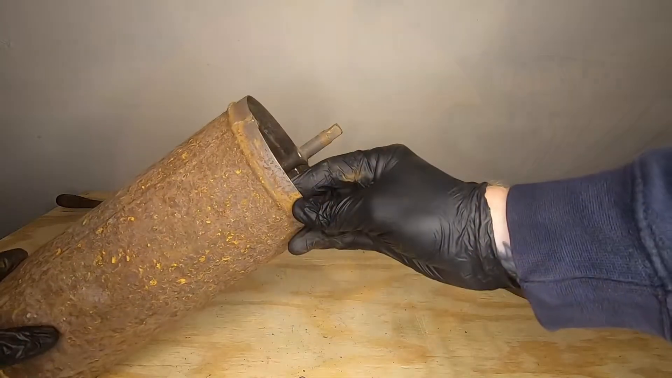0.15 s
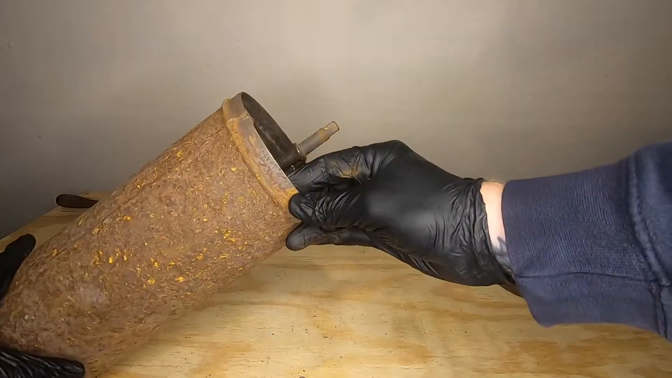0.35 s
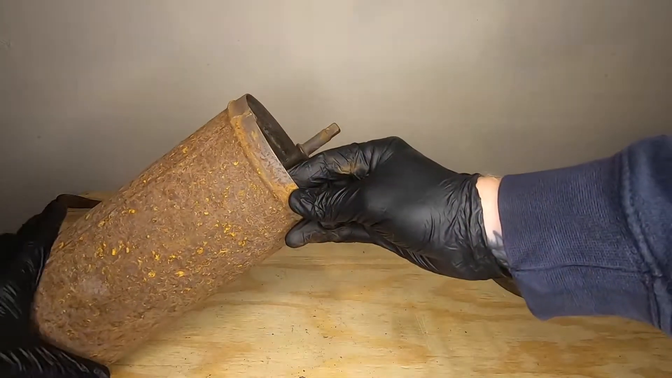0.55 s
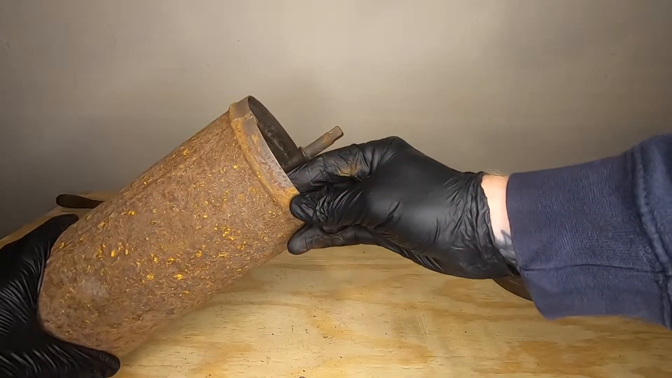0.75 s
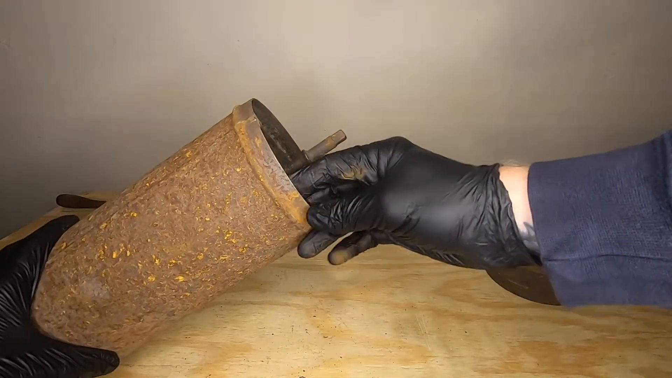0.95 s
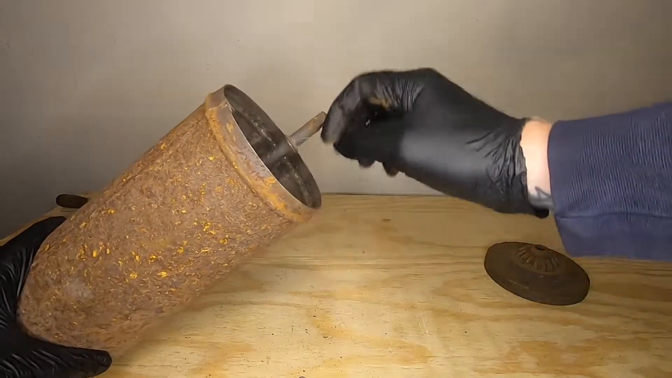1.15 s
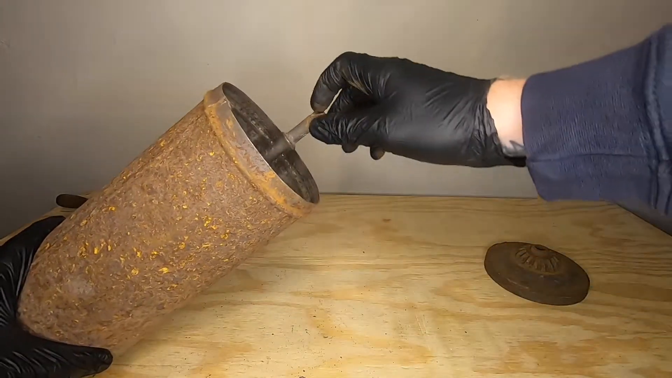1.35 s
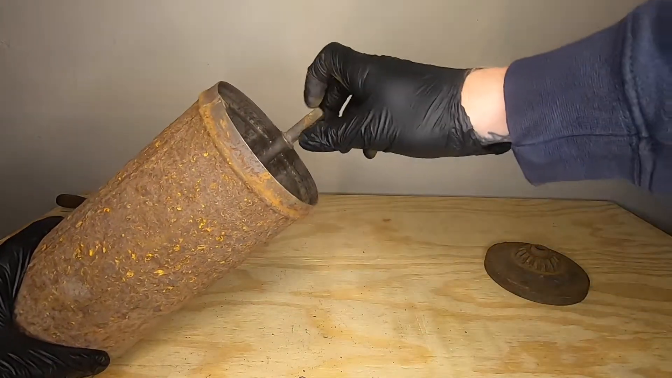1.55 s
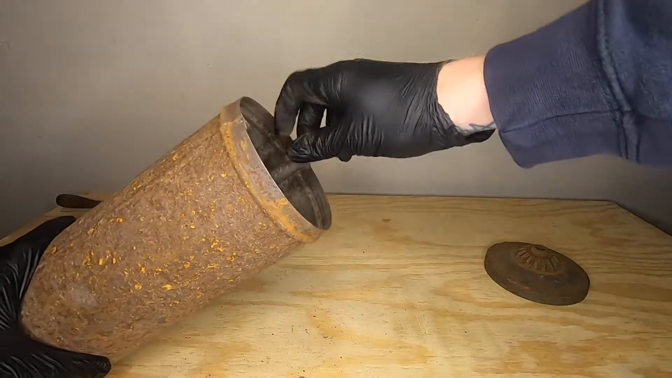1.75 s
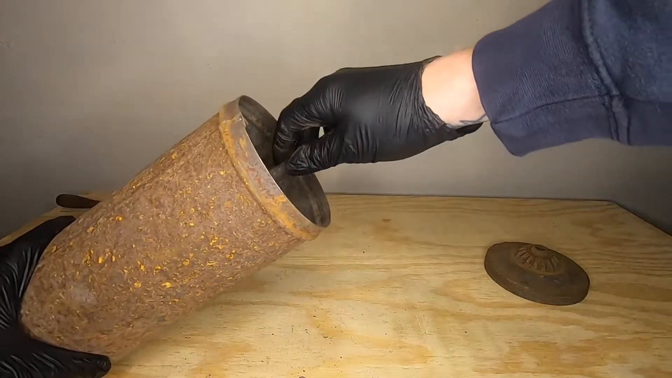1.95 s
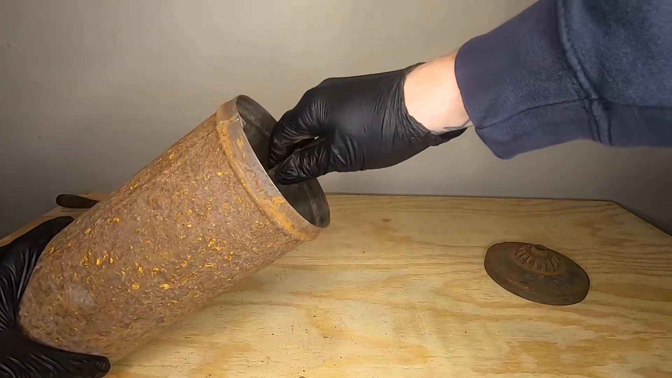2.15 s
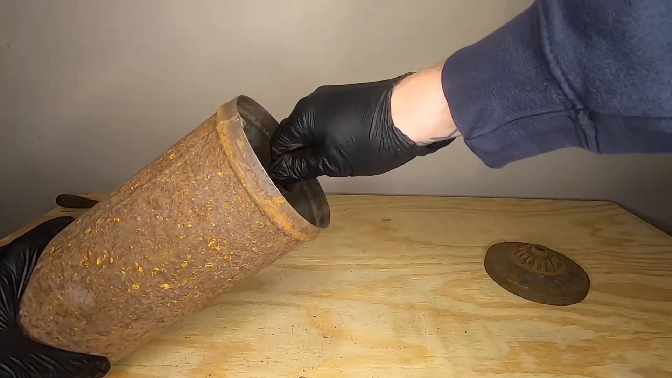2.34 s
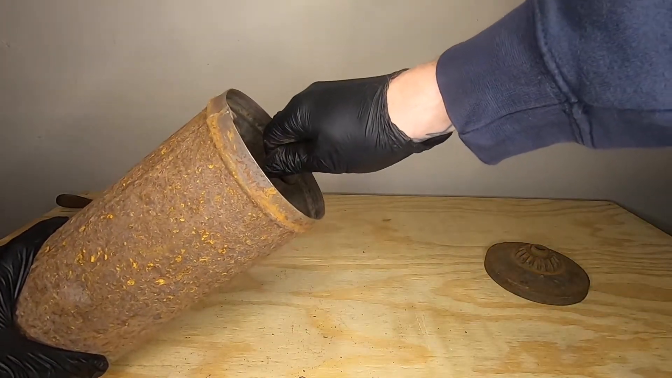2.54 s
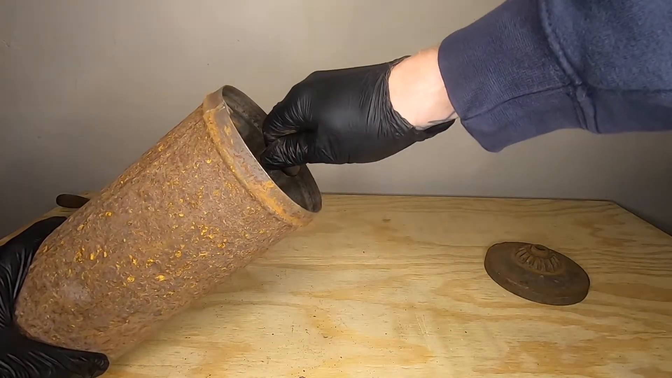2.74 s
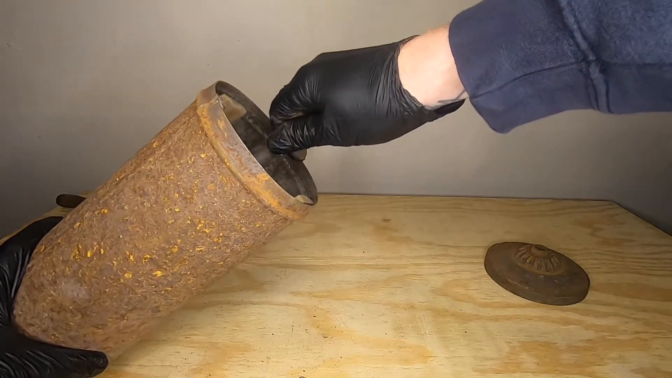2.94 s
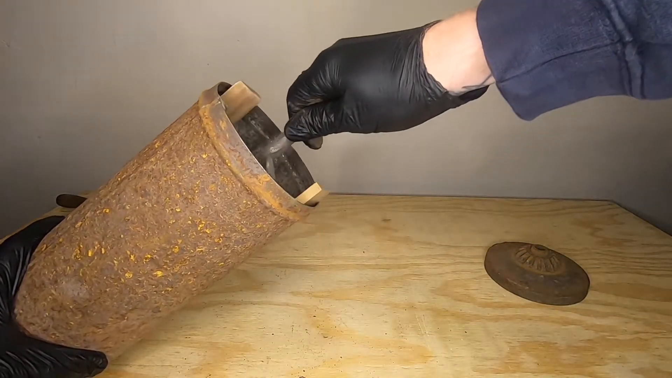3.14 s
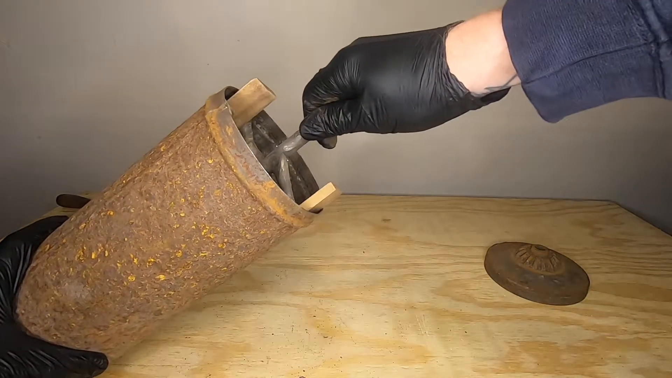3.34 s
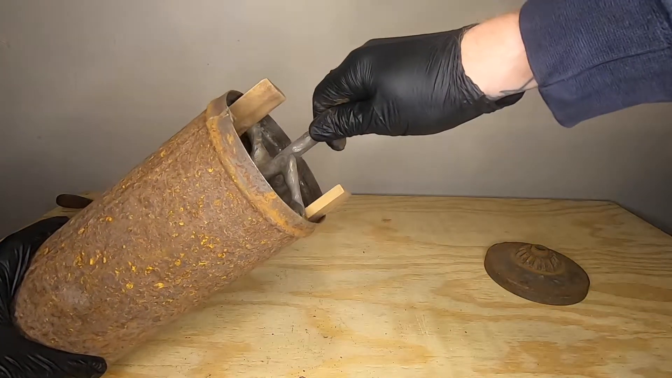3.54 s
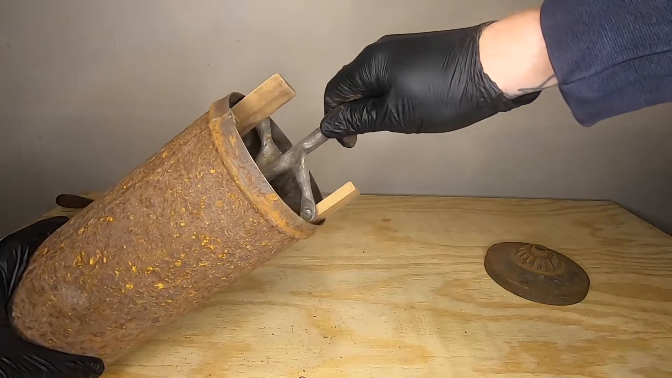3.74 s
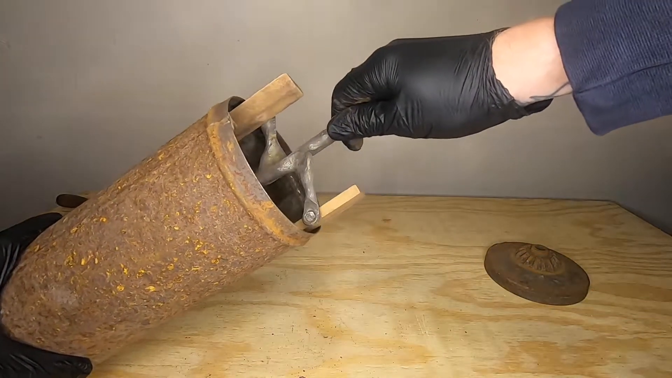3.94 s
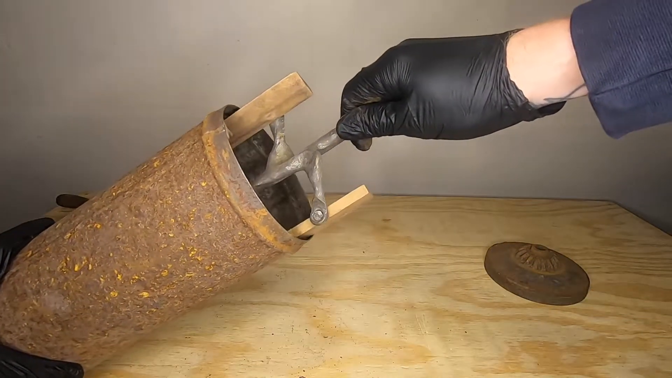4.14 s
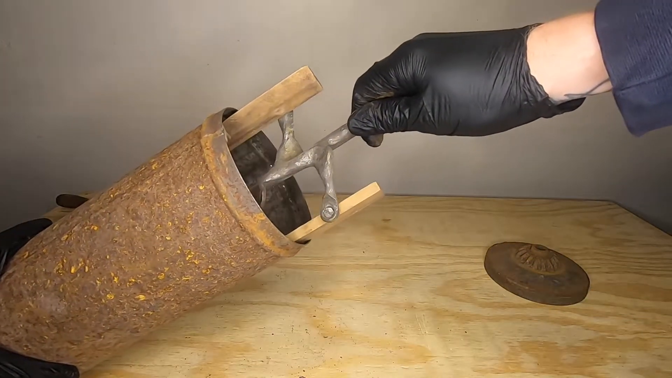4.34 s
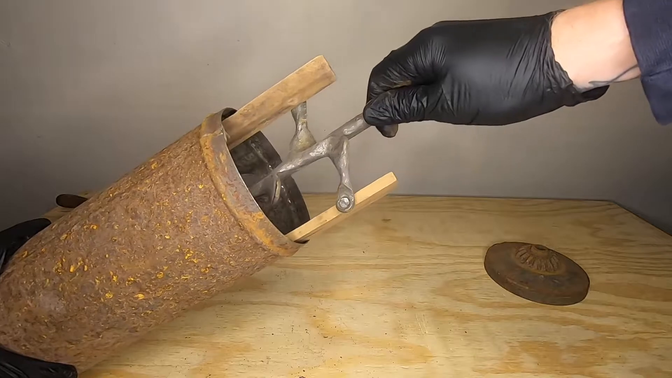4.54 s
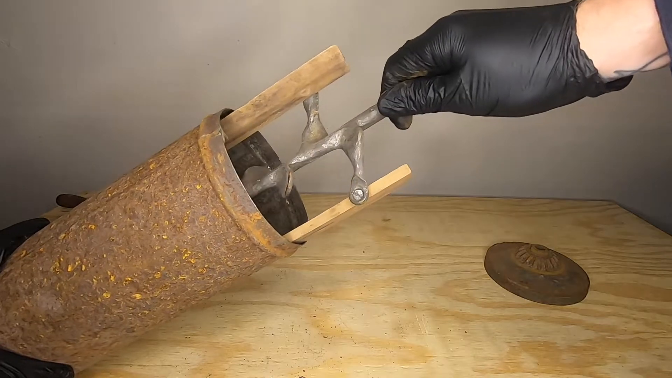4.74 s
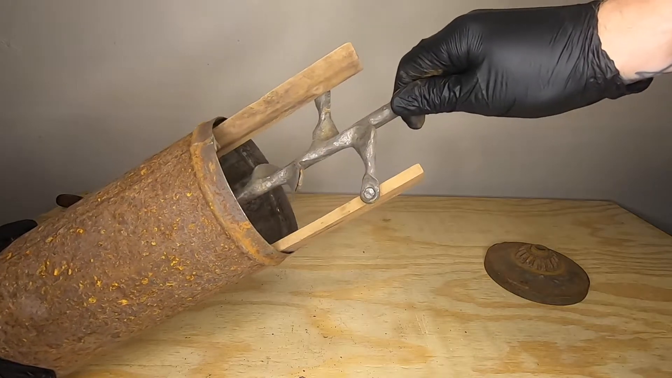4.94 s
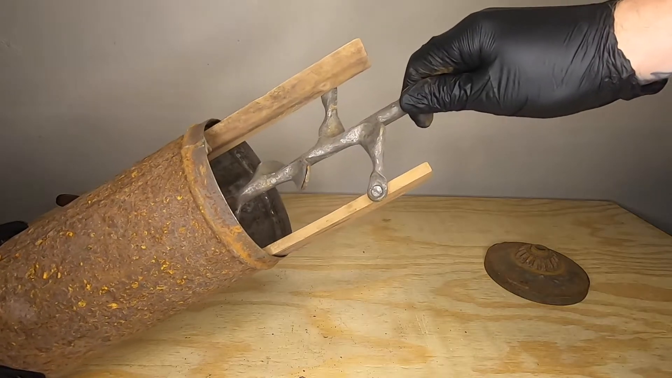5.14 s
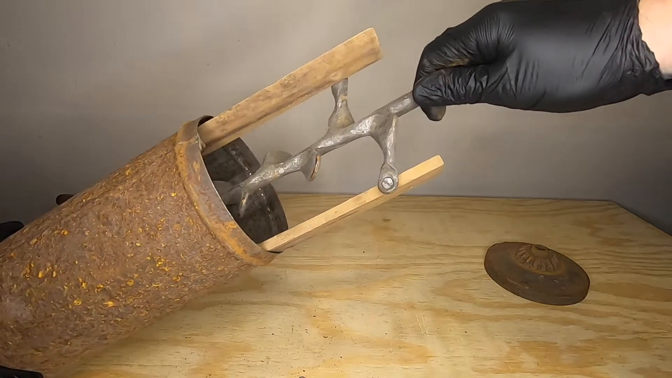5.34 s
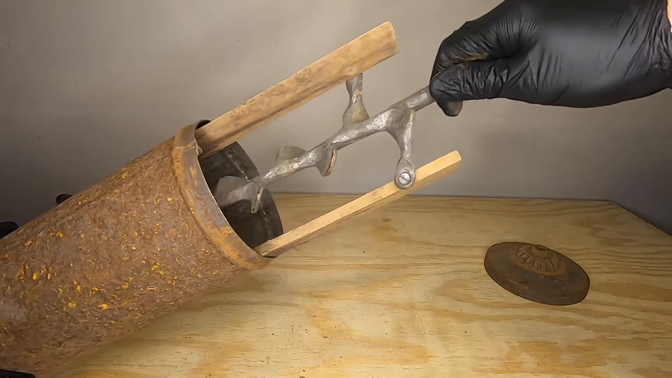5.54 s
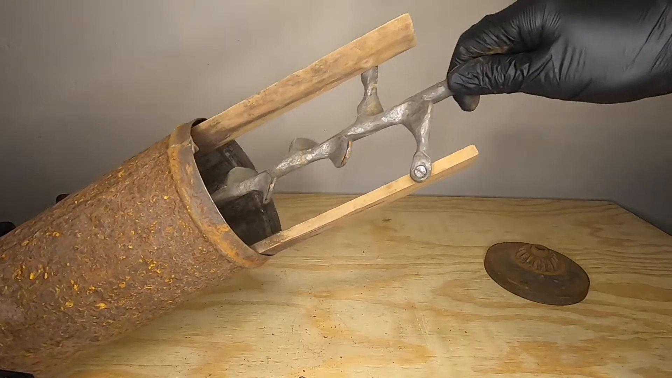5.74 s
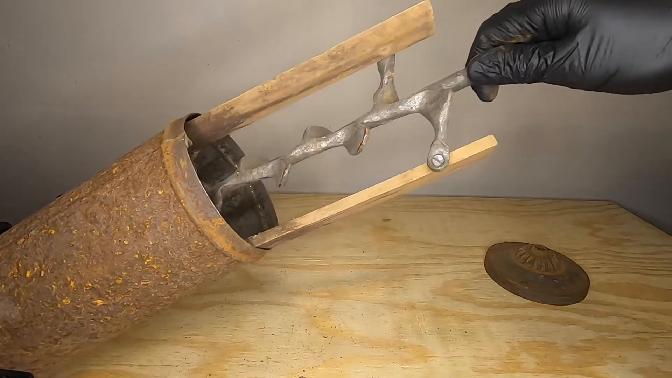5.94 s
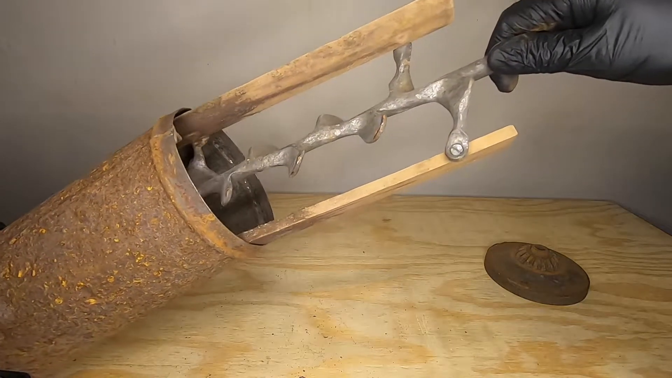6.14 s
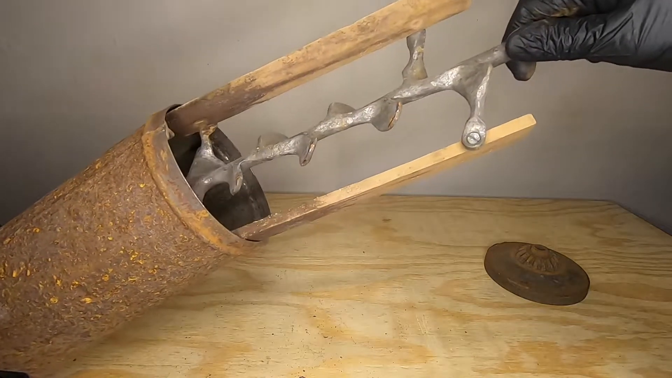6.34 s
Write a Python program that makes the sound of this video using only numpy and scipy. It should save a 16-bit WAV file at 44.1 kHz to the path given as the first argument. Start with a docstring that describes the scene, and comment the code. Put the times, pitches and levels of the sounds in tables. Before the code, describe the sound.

Dull thuds and glove rustle, a pause, then harsh rusty scraping and sharp metallic knocks as a steel part is dragged from a can.

```python
"""A small quiet workshop, with a two-port microphone close to a rusty can that leans on a plywood bench.
A steel and wood dasher is shifted, then dragged out: random rust grains and catches ring wall and steel modes.
Filtered noise hums in the can's air column and the bench; bumps ring decaying plywood modes.
Coloured noise makes the rubber gloves rustle and a lid slide aside; the near walls and still air surround it."""
import sys
import numpy as np
from scipy import signal
from scipy.fft import rfft, irfft, next_fast_len
from scipy.io import wavfile
from scipy.ndimage import map_coordinates

SR = 44100
rng = np.random.default_rng(int(sys.argv[2]) if len(sys.argv) > 2 else 0)


def bounce(signal):
    """Save signal as a 16-bit WAV file at the path given by the first command-line argument."""
    frames = np.transpose(np.atleast_2d(signal))
    limited = np.clip(frames, -1, 1)
    pcm = np.round(limited * 32767).astype(np.int16)
    wavfile.write(sys.argv[1], SR, pcm)


N = 281754
T = np.arange(N) / SR
PULL_START_S = 1.6  # before this the dasher lies deep in the can


def amp(db):
    """Decibels to amplitude."""
    return 10 ** (np.asarray(db) / 20)


def unit(x):
    """Scale to an rms of one."""
    return x / np.sqrt(np.mean(x ** 2) + 1e-20)


def along(points, hz):
    """Read (pitch_hz, value) points on a log pitch axis."""
    f, v = np.transpose(points)
    return np.interp(np.log(hz + 1), np.log(f + 1), v)


def gains(rows):
    """Gain per sample for each dB column, practically silent (-140 dB) outside the table."""
    s, *columns = np.transpose(rows)
    return [amp(np.interp(T, s, column, -140, -140)) for column in columns]


def wobble(rate, count=N):
    """A smooth random curve, rate knots a second."""
    knots = rng.standard_normal(int(count * rate / SR) + 4)
    return map_coordinates(knots, [T[:count] * rate])


def filtered(x, response):
    """Multiply the spectrum of x by a complex response of frequency."""
    m = next_fast_len(N + SR // 2)
    return irfft(rfft(x, m) * response(np.fft.rfftfreq(m, 1 / SR)), m)[..., :N]


def body(response):
    """Scale the response so that white noise keeps its rms."""
    size = np.sqrt(np.mean(np.abs(response(np.arange(1, SR / 2))) ** 2))
    return lambda hz: response(hz) / size


def modes(table):
    """Causal sum of resonances with alternating signs."""
    def response(f):
        return sum((-1) ** k * amp(db) * 1j * f * width / (centre ** 2 - f * f + 1j * f * width)
                   for k, (centre, width, db) in enumerate(table))
    return body(response)


def colour(points):
    """Noise colour drawn through (pitch_hz, density_db) points."""
    return body(lambda hz: amp(along(points, hz)))


def grains(per_second, spread_db):
    """Random pulses of uneven size, at an rms of one."""
    hit = rng.random(N) < per_second / SR
    spread = max(spread_db, 0) * np.minimum(rng.exponential(size=N), 3.5)
    return unit(hit * rng.standard_normal(N) * amp(spread))


def bursts(rows, rise_share):
    """Envelope of (start_s, level_db, t60_s) events; the rise constant is a small share of the t60."""
    env, t = np.zeros(N + SR), np.arange(SR // 2) / SR
    for s, db, t60 in rows:
        env[round(s * SR):][:len(t)] += amp(db - 60 * t / t60) * (1 - np.exp(-t / (rise_share * t60)))
    return env[:N]


# Colour of the still room air: pitch_hz [Hz], density_db [relative dB per Hz]
AIR_COLOUR = [(25, -3.5), (98, -14), (182, 8), (536, -16.5), (709, -8.5), (1100, -17.5), (3500, -33)]
# Out-of-step part of the air against its common part: pitch_hz [Hz], level_db [dB]
AIR_SIDE_LEVEL = [(60, -39), (200, -1), (700, 5.5), (2400, 7)]
AIR_DB = -70.5


def air():
    """Still room as slowly wavering noise; the middle range arrives out of step at the two ports."""
    mid, side = filtered(rng.standard_normal((2, N)), colour(AIR_COLOUR))
    side = filtered(side, lambda hz: amp(along(AIR_SIDE_LEVEL, hz)))
    return amp(AIR_DB + 1.6 * wobble(3.5)) * (mid + side * np.array([[1], [-1]]))


# Decay of the workshop walls' answer: pitch_hz [Hz], t60_s [s]
SHOP_DECAY = [(150, 0.6), (1500, 0.17), (8000, 0.026)]
# Level of the walls against direct sound: pitch_hz [Hz], level_db [dB]
WALL_ANSWER = [(200, -27), (700, -8.5), (4200, -5.5), (6400, 6.5), (9000, 14)]


def shop(x):
    """Near walls answer as decaying noise, differently at each port; paths change as the parts move."""
    wet, step = np.zeros((2, N + SR)), SR // 20
    fade = np.hanning(2 * step)
    padded = np.pad(x, (step, step))
    for start in range(0, N, step):
        hz, t, z = signal.stft(rng.standard_normal((2, SR // 4)), SR, nperseg=256)
        decay = amp(-60 * t / along(SHOP_DECAY, hz)[:, None])
        tail = signal.istft(z * decay, SR, nperseg=256)[1]
        piece = padded[start:start + 2 * step]
        piece = piece * fade[:len(piece)]
        echo = signal.fftconvolve(piece[None], tail / np.linalg.norm(tail[0]), axes=1)
        wet[:, start:start + echo.shape[1]] += echo
    late = wet[:, step - 60:][:, :N]  # the answer begins 60 samples after the direct sound
    return filtered(late, lambda hz: amp(along(WALL_ANSWER, hz)))


# Colour of the lid on plywood: pitch_hz [Hz], density_db [relative dB per Hz]
LID_COLOUR = [(1000, -18.5), (1350, -9), (1950, -9.5), (2250, -16.5), (3500, -23)]
LID_START_S, LID_SLOWS_S, LID_STOP_S, LID_EDGE_S = 0.48, 1.05, 1.36, 0.033
LID_DB, LID_FADES_DB = -65, 8
LID_THINS_HZ = 1620  # once the lid slows, only the part above this pitch grinds on


def lid():
    """The lid slides aside: coloured friction noise that thins as it slows."""
    slide, = gains([(LID_START_S - LID_EDGE_S, LID_DB - 12), (LID_START_S, LID_DB),
                    (LID_SLOWS_S, LID_DB), (LID_STOP_S, LID_DB - LID_FADES_DB),
                    (LID_STOP_S + LID_EDGE_S, LID_DB - 18)])
    grind = filtered(slide * rng.standard_normal(N), colour(LID_COLOUR))
    thin = filtered(grind, lambda hz: 1 / (1 + (LID_THINS_HZ / (hz + 1)) ** 12))
    slowed = np.clip((T - LID_SLOWS_S) / LID_EDGE_S, 0, 1)
    return (1 - slowed) * grind + slowed * thin


# Glove rustle: time_s [s], level_db [dB]
GLOVE_RUSTLE = [(0, -68.5), (0.66, -69), (0.99, -60.5), (1.1, -70.5), (1.56, -73), (2.0, -66),
                (2.12, -71.5), (2.3, -67), (2.37, -75), (2.55, -68.5)]
# Glove ticks and short rubs: start_s [s], level_db [dB], t60_s [s]
GLOVE_TICKS = [(0.04, -42.5, 0.025), (0.128, -46, 0.035), (0.722, -44.5, 0.062), (0.776, -42, 0.019),
               (1.116, -30, 0.003), (1.143, -33, 0.0018), (1.304, -49, 0.047), (1.475, -52, 0.16),
               (1.605, -46.5, 0.15)]
# Colour of rubber: pitch_hz [Hz], density_db [relative dB per Hz]
RUBBER_COLOUR = [(900, -75), (1500, -9.5), (2660, -13.5), (3200, -5), (4700, -5), (9750, -1.5),
                 (16000, -15.5)]


def gloves():
    """Rubber friction as unsteady coloured noise, with short decaying ticks and rubs."""
    rustle, = gains(GLOVE_RUSTLE)
    rub = rustle * amp(2.6 * wobble(39.8)) * rng.standard_normal(N)
    rub += bursts(GLOVE_TICKS, rise_share=0.11) * rng.standard_normal(N)
    return filtered(rub, colour(RUBBER_COLOUR))


# Shoves on the leaning can, at their peak:
# peak_s [s], air_column_db [dB], plywood_db [dB], bench_shake_db [dB]
CAN_SHOVES = [(-0.02, -57, -62, -40.5), (0.42, -42.5, -26.5, -55), (2.64, -38, -29.5, -42.5),
              (3.56, -60, -61, -53), (3.921, -46, -48, -77), (4.201, -45, -39, -29.5),
              (4.28, -56, -38, -28), (5.03, -60, -43.5, -68), (5.13, -62, -43.5, -40),
              (5.511, -47, -37.5, -44), (5.6, -48, -47.5, -57), (6.34, -42, -70, -87)]
# The next four lists hold air column, plywood, bench
SHOVE_RISE, SHOVE_FALL = [300, 420, 700], [350, 141, 330]  # dB per s
DRAG_HUM_DB = [-55.5, -51, -100]  # hum under a scrape of -43 dB
DRAG_HUM_GROWS = [0.81, 1, 0.6]  # dB per dB of scrape
SHAKE_LAG_S = 0.011  # the heavy bench answers late
PLYWOOD_REST_DB = -74.5
DEEP_HUM_DB = -27  # the dasher lying deep damps the air column's drag hum


def load():
    """Gains of air column, plywood and bench: a hum that follows the scrape, and a swell at each shove."""
    scrape_db = 20 * np.log10(scrape_gain())
    out = amp(np.c_[DRAG_HUM_DB] + np.c_[DRAG_HUM_GROWS] * (scrape_db + 43))
    out[0] *= np.where(T < PULL_START_S, amp(DEEP_HUM_DB), 1)
    out[1] += amp(PLYWOOD_REST_DB)
    for s, *peak_db in CAN_SHOVES:
        since = T - s - np.c_[[0, 0, SHAKE_LAG_S]]
        slope = np.where(since < 0, -np.c_[SHOVE_RISE], np.c_[SHOVE_FALL])
        out += amp(np.c_[peak_db] - slope * since)
    return out


# Air resonances in the can: pitch_hz [Hz], width_hz [Hz], level_db [relative dB]
AIR_COLUMN = [(260.2, 8.2, 4.5), (289.8, 11, 18.5)]
# Plywood and bench modes: pitch_hz [Hz], width_hz [Hz], level_db [relative dB]
PLYWOOD_MODES = [(85, 39, 4), (143.9, 12, -10), (182.2, 50, -2), (228.7, 100, -4), (283, 35, -0.5),
                 (380, 29, 2.5), (508, 5.3, 0), (650.4, 2.2, 11.5)]


def load_hum():
    """The shifting load pushes noise through the resonances of air column, plywood and bench."""
    column, wood, shake = load()
    push = rng.standard_normal((3, N))

    def column_body(hz):
        return modes(AIR_COLUMN)(hz) / (1 + (hz / 400) ** 6) / (1 + (150 / (hz + 1)) ** 6)

    def wood_body(hz):
        return modes(PLYWOOD_MODES[1:])(hz) / (1 + (hz / 260) ** 6) / (1 + (115 / (hz + 1)) ** 6)

    def bench_body(hz):
        return modes([(58, 15, -8), PLYWOOD_MODES[0]])(hz) / (1 + (hz / 120) ** 4)

    out = filtered(column * push[2], column_body)
    out += filtered(wood * push[0], wood_body)
    return out + filtered(shake * push[1], bench_body)


# Bumps on the bench: start_s [s], level_db [dB], t60_s [s, before the extra loss of each mode],
# rise_s [s], favoured_pitch_hz [Hz]
BENCH_BUMPS = [(0.089, -45, 0.088, 0.0055, 179), (0.344, -46, 0.74, 0.015, 338),
               (0.408, -24, 0.18, 0.0019, 214), (0.497, -22, 0.21, 0.0021, 163),
               (1.317, -40.5, 0.48, 0.0008, 200), (2.557, -33.5, 1, 0.029, 280),
               (2.784, -34, 0.18, 0.0032, 156), (4.195, -14.5, 0.17, 0.012, 174),
               (5.482, -31, 0.16, 0.029, 280), (6.272, -30, 0.16, 0.015, 228)]
BUMP_WAVER = 1  # radians: plywood does not ring cleanly
BUMP_UNDER_DB = 2  # a further loss per octave below the favoured pitch


def bumps():
    """Soft bumps ring the plywood as wavering, decaying sines."""
    thud, t = np.zeros(N + SR), np.arange(SR // 2) / SR
    for s, db, t60, rise, pitch in BENCH_BUMPS:
        ring = 0
        for hz, _, level in PLYWOOD_MODES:
            # modes far from the favoured pitch are struck more weakly; high modes die sooner
            mode_db = level - 20.7 * abs(np.log2(hz / pitch))
            mode_db -= BUMP_UNDER_DB * max(np.log2(pitch / hz), 0)
            mode_db = mode_db + rng.normal(0, 0.9) - 0.23 * hz * t
            phase = 2 * np.pi * hz * t + BUMP_WAVER * wobble(43.6, count=len(t))
            ring = ring + amp(mode_db) * np.sin(phase)
        env = amp(db - 60 * t / t60) * (1 - np.exp(-(t / rise) ** 2))
        thud[round(s * SR):][:len(t)] += env * ring
    return thud[:N]


HUM_S, HUM_LENGTH_S, HUM_DB = 2.003, 0.31, -59.5


def plywood_hum():
    """The lowest strong plywood mode hums briefly: one wavering sine that swells and fades."""
    swell = np.sin(np.pi * np.clip((T - HUM_S) / HUM_LENGTH_S, 0, 1))
    return amp(HUM_DB) * swell * np.sin(2 * np.pi * PLYWOOD_MODES[2][0] * T + wobble(21.4))


def can_and_bench():
    """Load hum, bumps and plywood hum together, with the deepest bass rolled off."""
    low = load_hum() + bumps() + plywood_hum()
    return filtered(low, lambda hz: (1j * hz / (48 + 1j * hz)) ** 2)


# Strokes of the blades on the wall (a shift, two hard pulls, a slow drag),
# one list per stroke: time_s [s], level_db [dB]
BLADE_STROKES = [
    [(0.2, -73.5), (0.3, -57), (0.335, -43.5), (0.41, -45), (0.47, -58), (0.63, -52.5), (0.68, -62.5)],
    [(2.42, -71), (2.55, -63), (2.64, -39), (2.68, -39), (2.762, -53.5), (2.83, -39.5), (3.05, -37.5),
     (3.27, -41), (3.44, -47.5), (3.72, -41.5), (3.92, -45.5), (4.02, -61.5)],
    [(4.02, -72), (4.06, -50), (4.17, -32.5), (4.25, -43), (4.61, -38.5), (4.73, -41.5), (4.98, -35.5),
     (5.17, -48.5), (5.24, -53.5)],
    [(5.24, -55), (5.44, -53), (5.6, -50), (5.68, -55), (6.39, -54)],
]


def scrape_gain():
    """All strokes of the blades as one gain."""
    return sum(level for level, in map(gains, BLADE_STROKES))


SLIPS_PER_S, SLIP_T60_S = 160, 0.018


def slips():
    """Sudden small jumps of force that die within a few hundredths of a second."""
    jumps = (rng.random(N) < SLIPS_PER_S / SR) * np.minimum(rng.exponential(size=N), 2.5)
    return signal.fftconvolve(jumps, amp(-60 * T[:SR // 10] / SLIP_T60_S))[:N]


# Moving contact drives modes near one pitch hardest: time_s [s], favoured_pitch_hz [Hz]
CONTACT_PITCH = [(0.37, 3990), (0.5, 3400), (2.9, 3470), (3.3, 3200), (3.6, 4110), (4.2, 2600),
                 (4.57, 3560), (4.78, 4020), (4.97, 3980), (5.3, 3300)]
FAVOUR_DB, FAVOUR_OCTAVES = 5, 0.23
MODE_SHIFTS_PER_S = 14  # each mode is driven harder or softer as the contact moves


def rung(force, table, press, shift_db):
    """Resonators ring under the force; each mode takes its own, changing share."""
    whole = np.sqrt(sum(amp(row[2]) ** 2 * row[1] for row in table) * np.pi / SR)
    drawn_out = np.clip((T - PULL_START_S) / (T[-1] - PULL_START_S), 0, 1)
    stages = [T < PULL_START_S, drawn_out]
    favoured = np.interp(T, *np.transpose(CONTACT_PITCH))
    out = 0
    for k, (hz, width, db, *change_db) in enumerate(table):
        share_db = db + sum(c * stage for c, stage in zip(change_db, stages))
        share_db = share_db + press * shift_db * wobble(MODE_SHIFTS_PER_S)
        octaves = np.log2(hz / favoured)
        share_db = share_db + FAVOUR_DB * np.exp(-(octaves / FAVOUR_OCTAVES) ** 2)
        b, a = signal.iirpeak(hz, hz / width, SR)
        out = out + (-1) ** k * signal.lfilter(b, a, amp(share_db) * force)
    return out / whole


# Catches and knocks: start_s [s], level_db [dB], wall_ring_db [dB above level_db], t60_s [s]
BLADE_CATCHES = [(0.372, -12, -42, 0.013), (0.497, -27, 14, 0.054), (0.5002, -14.5, 7, 0.14),
                 (2.4663, -39, -24, 0.082), (2.549, -37, 7.5, 0.56), (2.7752, -20.5, -6, 0.021),
                 (2.8173, -15, -19, 0.07), (2.855, -19, 2, 0.094), (2.872, -20, -4, 0.033),
                 (3.0262, -17.5, -10, 0.062), (3.097, -27.5, 13.5, 0.074), (3.147, -32, 5, 0.05),
                 (3.281, -26, -15, 0.029), (3.396, -24.5, -15, 0.018), (3.476, -25, -18, 0.14),
                 (3.495, -26, -13, 0.13), (3.53, -27, 3.5, 0.095), (3.562, -30, 12, 0.024),
                 (3.6078, -16.5, -15, 0.074), (3.6629, -23.5, -26, 0.049), (3.705, -27.5, -19, 0.12),
                 (3.763, -20.5, -15, 0.083), (4.068, -28.5, -12, 0.16), (4.258, -23.5, -29, 0.23),
                 (4.567, -12.5, 6, 0.085), (4.758, -29, -18, 0.095), (4.862, -17, -2.5, 0.11),
                 (4.8878, -24, -20, 0.12), (4.928, -20, -4.5, 0.05), (5.158, -31.5, -22, 0.12),
                 (5.506, -27.5, 2, 0.16), (5.527, -29, -12, 0.043), (5.589, -33.5, -20, 0.053),
                 (5.597, -29, -9, 0.13), (5.612, -28.5, -7, 0.072), (6.262, -29.5, 3, 0.28),
                 (6.3074, -26.5, 5.5, 0.044)]
# Colour of bare rust grains: pitch_hz [Hz], density_db [relative dB per Hz]
GRIT_COLOUR = [(150, -44.5), (500, -17.5), (770, -24), (1090, -11), (1480, -3.5), (2300, -4), (4200, -3.5),
               (5000, -4), (9700, -0.5), (16000, -14.5)]
# Upper modes of the steel: pitch_hz [Hz], width_hz [Hz], level_db [relative dB]
STEEL_MODES = [(2656, 20, 12.5), (2898, 40, 14.5), (3039, 44, 9), (3235, 110, 13.5), (3483, 44, 11),
               (3746, 58, 15.5), (4070, 180, 3), (4360, 100, 15.5), (4900, 23, 7.5), (5580, 70, 8.5),
               (6000, 29, 8.5), (6430, 160, 15.5)]
# Lower modes of the can's wall: pitch_hz [Hz], width_hz [Hz], level_db [relative dB],
# deep_change_db [dB while the dasher lies deep], drawn_change_db [dB reached as it is drawn out]
WALL_MODES = [(498, 35, -20, 17, -8), (670.5, 20, -11, 2, 10.5), (775.7, 47, -6, 3, -0.5),
              (999, 27, -11.5, -3, 5.5), (1212, 23, -2.5, -9, -9), (1445, 42, 3, -1, 5.5),
              (1534, 24, 8, -3.5, -10.5), (1699, 40, -0.5, 5, 1.5), (1993, 13, -1, -3.5, -4.5),
              (2090, 25, -3, -22.5, 11)]
CRACK_LIGHT_DB, CRACK_HARD_DB = -6, -2  # treble of a catch under light and hard pressure
CRACK_DEEP_DB = -13.5  # muffled while the dasher lies deep
KNOCK_DB = 6  # the first instant of a catch strikes the modes, above its level
RING_LASTS = 1.23  # t60 of the wall ring over that of the catch
FLUTTER_DB, SLIP_DEPTH = 1.5, 0.39  # both grow with pressure
LIGHT_RING_DB = -1.5  # a light drag drives the wall less


def dasher():
    """Grains under the stroke and chattering catches, heard bare and through the modes of steel and wall."""
    scrape = scrape_gain()
    press = np.clip((20 * np.log10(scrape) + 58) / 18, 0, 1)  # 0 a light drag, 1 a hard one
    rust = grains(per_second=6000, spread_db=2.5)
    rust *= amp(FLUTTER_DB * press * wobble(60))
    rust *= 1 + SLIP_DEPTH * press * slips()  # hard pressure sticks and slips
    rubbing = scrape * rust

    chatter = amp(-10.5) * grains(per_second=20000, spread_db=0)
    s, db, ring_db, t60 = np.transpose(BLADE_CATCHES)
    treble_db = CRACK_LIGHT_DB + (CRACK_HARD_DB - CRACK_LIGHT_DB) * np.interp(s, T, press)
    treble_db += CRACK_DEEP_DB * (s < PULL_START_S)
    clank = chatter * bursts(zip(s, db, t60), rise_share=0.0094)
    crack = chatter * bursts(zip(s, db + treble_db, t60), rise_share=0.0036)
    wall_catch = chatter * bursts(zip(s, db + ring_db, RING_LASTS * t60), rise_share=0.027)
    knock = np.bincount(np.round(s * SR).astype(int), amp(db + KNOCK_DB), N)

    def low(hz):
        return 1 / (1 + (hz / 5100) ** 12)

    treble = amp(-2.0 + 2.8 * press) * rubbing + amp(9.5) * crack  # a light drag is duller
    force = filtered(rubbing + amp(3.5) * clank, low)
    force += filtered(treble, lambda hz: 1 - low(hz))
    wall_force = amp(LIGHT_RING_DB * (1 - press)) * rubbing + wall_catch
    # a light drag is heard more through the steel
    bare = amp(-2.0 + 2.0 * press) * filtered(force, colour(GRIT_COLOUR))
    steel = amp(-6.0) * rung(force + knock, STEEL_MODES, press, shift_db=2.0)
    wall = amp(-8.5) * rung(wall_force, WALL_MODES, press, shift_db=3.0)
    return bare + steel + wall


# Lean of the near sound to one port: pitch_hz [Hz], left_minus_right_db [dB]
PORT_LEAN = [(200, -1.5), (1000, 4), (5000, 0), (15000, 1)]


def scene():
    """Close sources and their wall answers, leaning to one port, over the still air."""
    near = dasher() + can_and_bench() + gloves() + lid()

    def share(hz):
        lean = amp(along(PORT_LEAN, hz) * np.array([[.5], [-.5]]))
        # the more the walls carry, the lower direct sound and walls are set together
        return lean / np.sqrt(1 + amp(along(WALL_ANSWER, hz)) ** 2)

    return filtered(near + shop(near), share) + air()


# Treble response of the microphone ports: pitch_hz [Hz], level_db [dB]
PORT_TREBLE = [(9700, 3.5), (10200, -5.5), (14500, -8.5), (15300, -11)]
TOP_HZ = 15750  # band limit


def record(dry):
    """The microphone ports dull the top octave; nothing is kept above the band limit."""
    return filtered(dry, lambda hz: amp(along(PORT_TREBLE, hz)) * (hz < TOP_HZ))


dry = scene()
out = record(dry)
bounce(out)
```